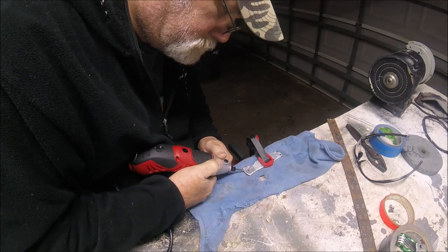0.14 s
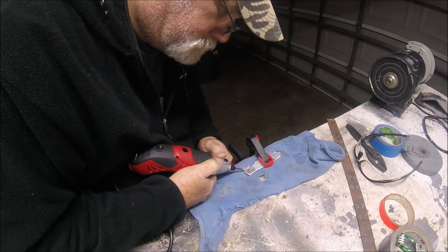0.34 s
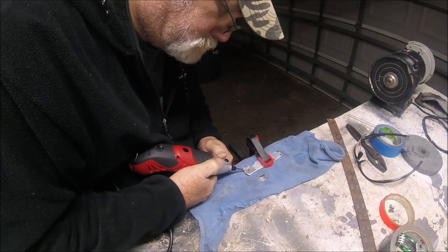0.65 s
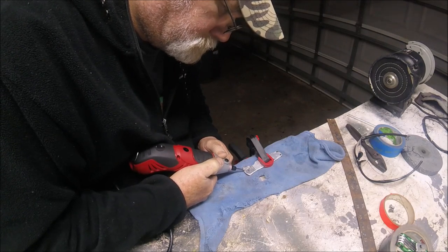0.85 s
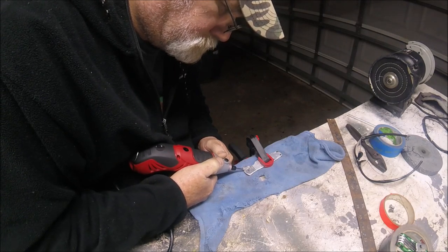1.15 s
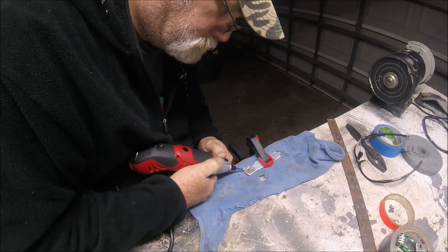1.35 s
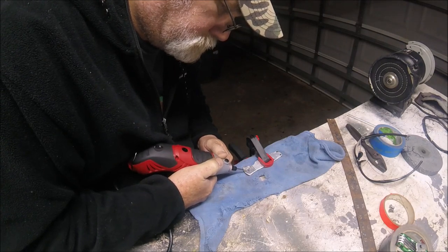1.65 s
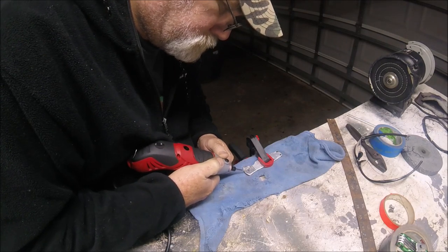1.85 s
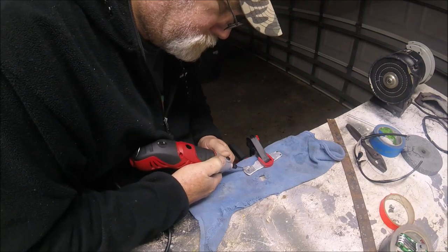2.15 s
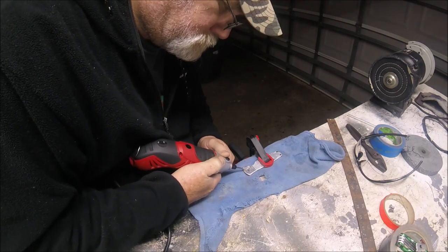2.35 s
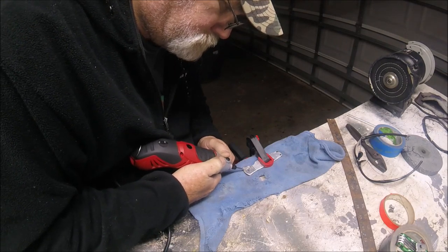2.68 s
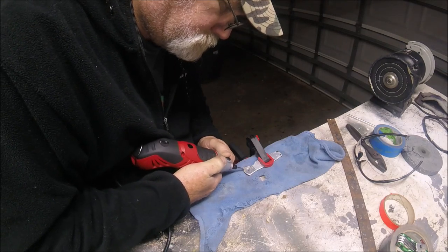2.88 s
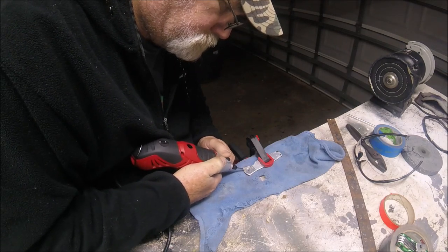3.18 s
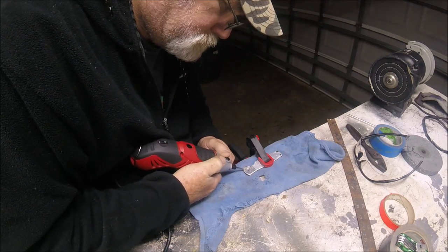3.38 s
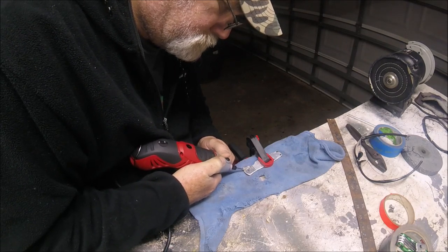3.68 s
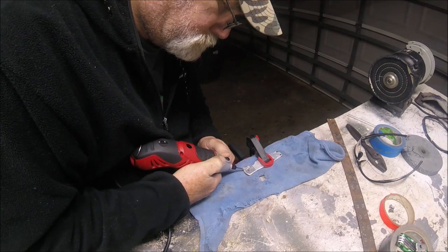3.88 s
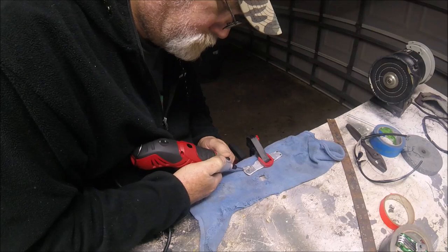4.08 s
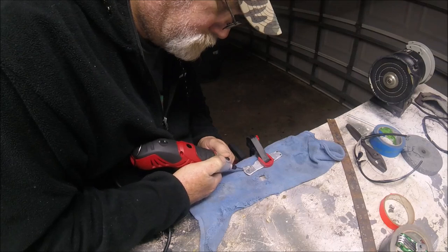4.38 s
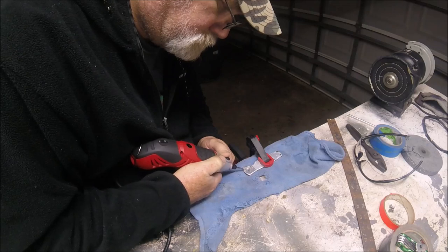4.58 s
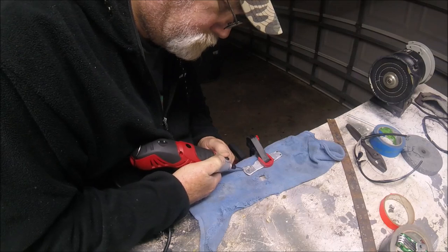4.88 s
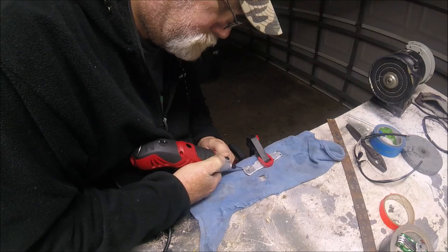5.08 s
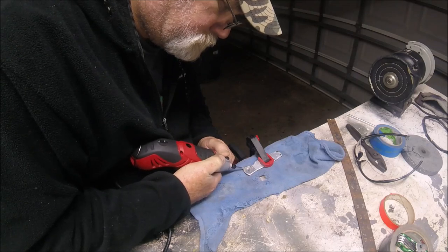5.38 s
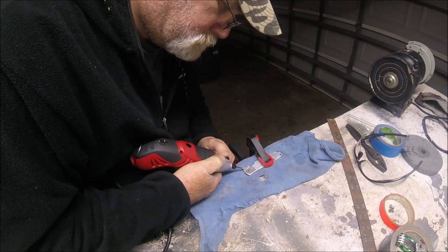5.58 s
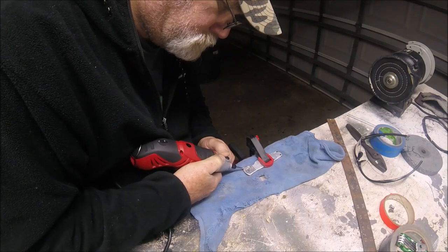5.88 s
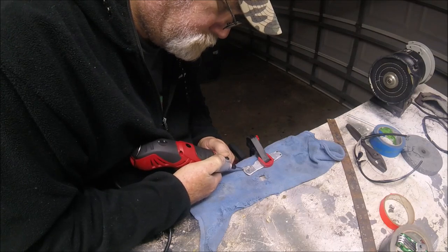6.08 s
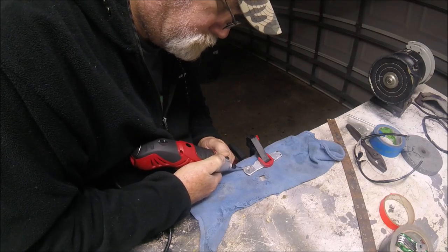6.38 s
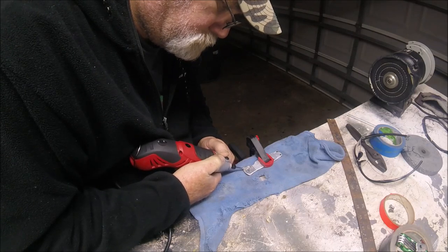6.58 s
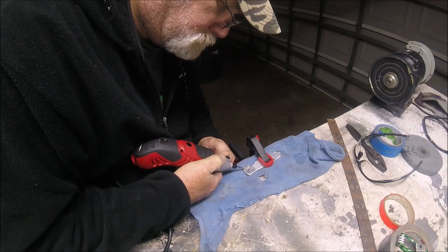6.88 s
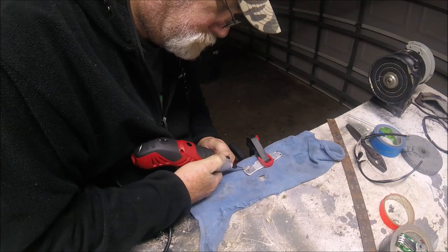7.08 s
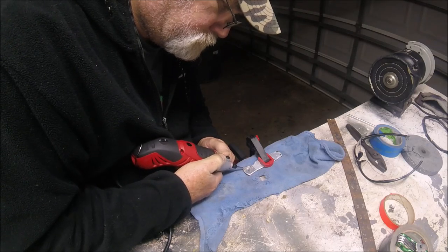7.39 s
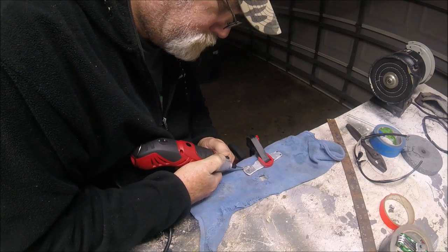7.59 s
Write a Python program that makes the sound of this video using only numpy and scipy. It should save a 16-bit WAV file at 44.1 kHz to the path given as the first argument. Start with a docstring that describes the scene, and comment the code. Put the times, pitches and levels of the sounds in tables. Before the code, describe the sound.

A small high-speed rotary tool whines steadily and is pressed repeatedly against metal, each press bursting into a loud, piercing, gritty buzz with screeches.

```python
"""Rotary tool grinding a small metal piece

A mains-powered rotary tool runs at about 21000 rpm over a workbench and is pressed five times against metal.
Running free, it whines, buzzes with the chopped mains current, and its fan hisses.
In the cut the bit strikes once a turn: the metal rings and grit rasps while the spindle slows.
It spins up again whenever the bit is lifted. A low workshop rumble lies underneath.
"""
import sys
import numpy as np
from scipy import signal
from scipy.fft import rfft, irfft
from scipy.io import wavfile
from scipy.ndimage import uniform_filter1d

SR = 44100
rng = np.random.default_rng(int(sys.argv[2]) if len(sys.argv) > 2 else 0)


def put_to_file(sound):
    """Save the sound as 16-bit audio at rate SR, in the file named by the first command-line argument."""
    columns = np.atleast_2d(sound).T  # one column per channel
    safe = np.clip(columns, -1, 1)
    whole_steps = np.round(safe * 32767)
    wavfile.write(sys.argv[1], SR, whole_steps.astype(np.int16))


N = 341334
TIME = np.arange(N) / SR

MAINS_HZ = 60
FREE_HZ, START_HZ, WORKING_HZ = 363.4, 341.8, 345  # spindle speeds in turns per second
HOUSING_HZ = 2690  # resonance of the tool's housing


def undb(db):
    """Decibels to gain."""
    return 10 ** (np.asarray(db) / 20)


def unit(x):
    """Scale to rms 1."""
    return x / np.sqrt(np.mean(x ** 2))


def curves(table):
    """The columns of a timed table, joined by straight lines to one value a sample."""
    seconds, *columns = np.transpose(table)
    return [np.interp(TIME, seconds, column) for column in columns]


def walk(rate):
    """Smooth random drift with a spread near 1, given a new target rate times a second."""
    step = max(int(SR / rate), 2)
    targets = rng.standard_normal(N)[:N // step + 1]
    return 1.22 * uniform_filter1d(np.repeat(targets, step), step)[:N]


def colour(x, points):
    """Shape a sound's spectrum by (Hz, dB) points; rms 1."""
    hz, db = np.transpose(points)
    bins = np.maximum(np.fft.rfftfreq(N, 1 / SR), 1)
    gain = undb(np.interp(np.log(bins), np.log(hz), db))
    return unit(irfft(rfft(x) * gain, N))


def resonate(x, hz, width_hz):
    """One resonance, gain 1 at its centre."""
    return signal.lfilter(*signal.iirpeak(hz, hz / width_hz, fs=SR), x)


def each_turn(turns):
    """One random value for every turn of the spindle, joined by straight lines."""
    values = rng.standard_normal(N // 100)
    return np.interp(turns, np.arange(len(values)), values)


def swell(at_s, length_s):
    """A smooth rise and fall around at_s, length_s wide at half height."""
    return np.cos(np.pi / 2 * np.clip((TIME - at_s) / length_s, -1, 1)) ** 2


# Spectrum of the workshop rumble: pitch_hz, relative level_db
RUMBLE_SPECTRUM = [(20, -15), (48, -11), (75, -3.5), (100, -13), (170, -23), (400, -18.5)]


def shop(rumble_db=-60):
    """Low steady rumble of the workshop: noise that falls away steeply towards the treble."""
    return undb(rumble_db) * colour(rng.standard_normal(N), RUMBLE_SPECTRUM + [(4000, -77.5)])


# The presses of the bit on the metal. The tone and grit columns are base values at the working speed:
# start_s, end_s, seating_time_s, drone_db (twice a turn), chatter_db (four times a turn),
# main_ring_db, main_ring_hz, upper_ring_db, upper_ring_hz, upper_ring_width_hz, grit_db
PRESSES = [(-0.1, 0.422, .05, -33.5, -39, -28.5, 5170, -32.5, 6500, 398, -35),
           (0.829, 1.674, 0.051, -31, -40, -26.5, 5170, -37, 6800, 1700, -41),
           (2.883, 4.792, 0.052, -30.5, -36, -31, 5080, -33.5, 6670, 1610, -40),
           (5.024, 6.702, 0.034, -30, -33, -28.5, 5230, -34.5, 6600, 1700, -40),
           (7.058, 7.9, 0.036, -30, -35, -30, 4800, -32.5, 5900, 1118, -40.5)]
BITE_S, LIFT_S = 0.0079, .05  # time for the first touch, time to leave the cut


def contact(seating=False):
    """1 while the bit is on the metal, with a ramp at each lift and touch: quick, or as slow as the bit seats."""
    total = 0
    for start, end, seat_s, *_ in PRESSES:
        touch_ramp = (TIME - start) / (seat_s if seating else BITE_S)
        lift_ramp = (end - TIME) / LIFT_S
        total = total + np.clip(np.minimum(touch_ramp, lift_ramp), 0, 1)
    return total


# How hard the bit is pushed while it touches: at_s, drag_hz (speed the drag would take away)
PRESSURE = [(0.0, 22.7), (0.15, 32.4), (0.22, 4.3), (0.41, 24.2), (0.83, 10.7), (1.1, 19.9), (1.22, 44.9),
            (1.32, 0.0), (1.42, 29.9), (1.65, 29.9), (2.89, 0.0), (3.0, 8.9), (3.2, 53.3), (3.38, 4.8),
            (3.56, 17.1), (3.8, 27.5), (3.95, 21.7), (4.62, 29.9), (4.77, 5.2), (5.02, 0.0), (5.12, 22.3),
            (5.28, 8.4), (5.6, 21.6), (5.9, 36.5), (6.32, 30.4), (6.46, 44.9), (6.69, 2.8), (7.06, 13.7),
            (7.3, 27.6), (7.54, 38.7), (7.68, 16.3)]


def drag():
    """The load on the spindle, as the speed in Hz that it would take away."""
    pressure, = curves(PRESSURE)
    return pressure * (contact() > 1 / 2)


def spindle(lag_s=.57):
    """Turns per second: the rotor's inertia makes it lag behind the free speed less the drag."""
    keep = np.exp(-1 / (lag_s * SR))
    target = FREE_HZ - drag()
    return START_HZ + signal.lfilter([1 - keep], [1, -keep], target - START_HZ)


def current(peak_at, sharpness):
    """The speed control lets one pulse of current through in each half wave of the mains; mean 1."""
    pulse = np.exp(sharpness * np.cos(2 * np.pi * (2 * MAINS_HZ * TIME - peak_at)))
    return pulse / pulse.mean()


# Partials of the free motor: multiple of the speed, base level_db
MOTOR_PARTIALS = [(2, -59), (4, -68), (6, -67), (13, -54.5), (14, -54), (15, -48), (16, -43.5), (17, -56),
                  (18, -52), (19, -62), (20, -65), (21, -67), (23, -66), (24, -65), (25, -66)]


def rotor_whine(angle, below_top, pull, throb=0.16):
    """The turning rotor hums at multiples of its speed, pulsing with the current."""
    whine = 0
    for order, db in MOTOR_PARTIALS:
        wave = np.sin(order * angle + rng.uniform(0, 2 * np.pi))
        whine = whine + undb(db + 1.3 * walk(16)) * wave
    return np.sqrt(2) * whine * (1 + throb * (pull - 1)) * undb(.2 * below_top)


def rotor_shake(angle, pull):
    """The current shakes the unbalanced rotor; the small housing radiates nothing far below the turning rate."""
    housing = signal.butter(10, 335, "high", fs=SR, output="sos")
    return unit(signal.sosfilt(housing, pull * np.sin(angle)))


def slot_buzz(angle, hz):
    """Eight armature slots pass the poles and the brushes spark; current pulses make them ring the housing."""
    sparks = .3 * rng.standard_normal(N)
    wave = current(peak_at=.69, sharpness=2.6) * (np.sin(8 * angle) + sparks)
    ringing = unit(resonate(resonate(wave, HOUSING_HZ, 460), HOUSING_HZ, 460))
    # the buzz fades as the speed outruns the resonance
    return undb(-.4 * np.maximum(hz - 353, 0) + .7 * walk(30)) * ringing


def armature_buzz(angle, below_top):
    """Abrupt switching of the current spreads a comb of weaker lines around the ninth partial."""
    switching = current(peak_at=.45, sharpness=14)
    return undb(.3 * below_top) * unit(resonate(switching * np.sin(9 * angle), 3330, 190))


def bearing_whine(angle, below_top, bearing_db=-50.7):
    """The balls run over the race at no whole multiple of the speed, with a weaker line one multiple higher."""
    race = np.sin(4.418 * angle) + .3 * np.sin(5.418 * angle)
    return undb(bearing_db + .45 * below_top + 1.6 * walk(14)) * unit(race)


# Spectrum of the fan's air: pitch_hz, relative level_db
FAN_SPECTRUM = [(200, -33), (520, -22), (750, -4), (1000, -16), (1250, -7.5), (1800, -11.5), (2750, -7),
                (3400, -10), (4100, -13.5), (4700, -4.5), (5300, -1), (6400, 0.5), (7000, -12.5),
                (8700, -12), (10000, -23)]


def fan_air(pull):
    """The fan's air is noise that flutters and pulses slightly with the current."""
    noise = rng.standard_normal(N) * (1 + .09 * (pull - 1)) * undb(.6 * walk(25))
    return colour(noise, FAN_SPECTRUM)


# The vents turn towards the microphone as the grip changes: at_s, lift_db of the whole motor
GRIP = [(.6, 1.5), (1.8, 1.1), (2.8, 3), (4.9, 3), (6.9, 3)]


def motor(turns, hz, shake_db=-63, slot_db=-39.6, armature_db=-47.2, fan_db=-40.5, braced_db=-7):
    """Rotor, buzz, bearing and fan together; the buzz drops while the bit is braced on the metal."""
    angle = 2 * np.pi * turns
    pull = current(peak_at=0.69, sharpness=2.1)
    below_top = hz - hz.max()  # the whines fade as the speed drops
    rotor = rotor_whine(angle, below_top, pull)
    shake = undb(shake_db) * rotor_shake(angle, pull)
    slots = undb(slot_db) * slot_buzz(angle, hz)
    armature = undb(armature_db) * armature_buzz(angle, below_top)
    buzz = undb(braced_db * contact()) * (shake + slots + armature)
    bearing = bearing_whine(angle, below_top)
    air = undb(fan_db) * fan_air(pull)
    grip_db, = curves(GRIP)
    return undb(grip_db) * (rotor + buzz + bearing + air)


# The bit catches and screeches: at_s (middle), length_s, main_ring_lift_db, main_ring_hz,
# upper_ring_lift_db, grit_change_db
SCREECHES = [(0.054, 0.22, 1, 5300, 4.5, -7.5), (0.287, 0.059, 8, 5300, 7.5, -6.5),
             (0.84, .02, 1.5, 4600, -1, 1), (0.988, 0.083, 1, 4870, 1, 4.5),
             (3.002, 0.046, 1, 5150, 3.5, 2.5), (3.117, 0.058, 8.5, 4930, 4.5, -22),
             (3.224, 0.087, 6.5, 5115, -1, 2), (3.455, 0.09, 7, 5340, 6, 6),
             (3.762, 0.043, 8, 5140, 0, -2.5), (4.635, 0.59, 6, 5194, 0, 2.5),
             (5.147, 0.05, 8.5, 5100, 1.5, -20.5), (5.267, 0.1, 6.5, 5170, 1.5, 2.5),
             (5.447, 0.062, 5.5, 5060, 0, 3.5), (5.63, 0.053, 2.5, 5130, 1, 0.5),
             (6.196, 0.32, 5.5, 5160, 0.5, -1), (6.48, 0.08, 7, 5140, -2, 0),
             (6.623, 0.19, 7, 5200, 2.5, 3), (7.08, 0.042, 6, 4890, -9, 1),
             (7.165, 0.04, 2, 5100, 2.5, -11), (7.633, 0.18, 4, 5400, 2.5, -0.5)]
# Dips in the tones, some from the hand easing off, one just before a touch:
# at_s (middle), length_s, change_db
TONE_DIPS = [(0.221, 0.036, -4.5), (1.068, 0.017, -1), (3.376, 0.19, -3.5), (5.005, 0.019, -28),
             (7.516, 0.045, -2)]
# The drone (twice a turn) and the chatter (four times a turn) swell or sink, together or apart:
# at_s (middle), length_s, drone_change_db, chatter_change_db
TONE_SWELLS = [(0.07, 0.17, 3.5, 1), (1.16, .08, 0.5, -3), (1.436, 0.092, 2, -1), (3.185, 0.38, 1.5, -0.5),
               (3.79, 0.12, 1.5, -1.5), (4.102, 0.12, 1, -1), (4.67, 0.059, 1.5, 2.5), (5.26, 0.1, -6, 0.5),
               (5.6, 0.076, 0, 3), (5.83, 0.21, 0.5, -3.5), (7.377, 0.28, 0, -3.5)]
# a faster bit bounces harder and rings lower; above the full speed the bouncing grows no further
CHATTER_DB_PER_HZ, FULL_CHATTER_HZ = 0.71, 351
RING_DB_PER_HZ, RING_SHIFT_HZ_PER_HZ = 0.2945, -18
# more drag tears off more grit, until the teeth are full
GRIT_DB_PER_HZ, FULL_GRIT_HZ = 0.3475, 30
SCREECH_DRONE_SHARE = 0.047  # a screech draws on the drone
# a resonance of the workpiece that the drone slides through
DRONE_HZ, DRONE_WIDTH_HZ, DRONE_LIFT_DB = 690, 12, 4


def cut(hz):
    """Levels and ring centres of the cut: each press has its own colour, bent by speed, drag and the tables."""
    held = [(s, *voice) for start, end, seat_s, *voice in PRESSES for s in (start, end)]
    drone, chatter, main, main_hz, upper, upper_hz, upper_width, grit = curves(held)
    fast = hz - WORKING_HZ
    drone = drone + DRONE_LIFT_DB / (1 + (2 * (2 * hz - DRONE_HZ) / DRONE_WIDTH_HZ) ** 2)
    chatter = chatter + CHATTER_DB_PER_HZ * (np.minimum(hz, FULL_CHATTER_HZ) - WORKING_HZ)
    main = main + RING_DB_PER_HZ * fast
    main_hz = main_hz + RING_SHIFT_HZ_PER_HZ * fast
    grit = grit + GRIT_DB_PER_HZ * (np.minimum(drag(), FULL_GRIT_HZ) - (FREE_HZ - WORKING_HZ))
    for at_s, length_s, lift_db, centre_hz, upper_lift_db, grit_db in SCREECHES:
        caught = swell(at_s, length_s)
        main = main + lift_db * caught
        main_hz = main_hz + (centre_hz - main_hz) * caught
        drone = drone - SCREECH_DRONE_SHARE * lift_db * caught
        upper = upper + upper_lift_db * caught
        grit = grit + grit_db * caught
    for at_s, length_s, drone_db, chatter_db in TONE_SWELLS:
        shape = swell(at_s, length_s)
        drone = drone + drone_db * shape
        chatter = chatter + chatter_db * shape
    dip = sum(db * swell(at_s, length_s) for at_s, length_s, db in TONE_DIPS)
    # the metal rings at first touch; drone and chatter build as the bit seats itself
    touch = 20 * np.log10(contact() + 1e-5)
    seated = 20 * np.log10(contact(seating=True) + 1e-5)
    drone = drone + seated + dip
    chatter = chatter + (touch + seated) / 2 + dip
    main = main + touch + dip
    upper = upper + touch + dip
    return drone, chatter, main, main_hz, upper, upper_hz, upper_width, grit + touch


def partials(angle, orders, gains, wander_db):
    """Partials of the strike with a joint rms near 1; each wanders and flickers as the contact point shifts."""
    gains = [g * undb(wander_db * walk(6) + walk(45)) for g in gains]
    tone = 0
    for order, gain in zip(orders, gains):
        # low partials push together; those above the ninth ring on with a phase of their own
        phase = (order > 9) * rng.uniform(0, 2 * np.pi) + 0.014 * order * walk(6.2)
        tone = tone - gain * np.cos(order * angle + phase)
    return tone * np.sqrt(2 / sum(g ** 2 for g in gains))


def ring(angle, hz, rows, centre_hz, width_hz, wander_db):
    """Strike partials lifted by a resonance of the metal, which moves with the grip and the contact point."""
    orders = [order for order, db in rows]
    gains = [undb(db) / np.hypot(1, 2 * (order * hz - centre_hz) / width_hz) for order, db in rows]
    return partials(angle, orders, gains, wander_db)


def recut(chips, turns, memory, count=3):
    """The same teeth meet the same grooves on the next turns, so the rasp partly repeats."""
    return sum(memory ** j * np.interp(turns - j, turns, chips) for j in range(count))


# Spectrum of the torn-off grit: pitch_hz, relative level_db
GRIT_SPECTRUM = [(200, -33.5), (540, -21), (800, -18.5), (1150, -20), (2000, -14), (2900, -10),
                 (3700, -17.5), (4400, -13.5), (5150, 1), (6000, -12.5), (7000, -11), (8000, -14),
                 (9600, -25.5)]


def grit_rasp(angle, turns, force, bite=0.057, bursts_db=1.4):
    """The teeth tear chips off in uneven bursts of noise, most as the bit strikes."""
    strike = np.exp(bite * np.cos(angle))
    chips = rng.standard_normal(N) * strike * force * undb(bursts_db * walk(50))
    return colour(recut(chips, turns, memory=.55), GRIT_SPECTRUM)


# Partials of the once-a-turn strike, as a dull knock and in the metal's two resonances.
# Each table: multiple of the speed, relative level_db
KNOCK_PARTIALS = [(3, -4), (5, 1.5), (6, -3), (9, 3.5), (10, -14), (11, -13), (12, -7)]
MAIN_RING_PARTIALS = [(13, -4.5), (14, 1.5), (15, 2.5), (16, 3), (17, -1)]
UPPER_RING_PARTIALS = [(18, 2.5), (19, 0.5), (20, -0.5), (21, -6.5), (22, -1.5), (23, -3.5), (24, -2),
                       (25, -1.5), (26, -11.5), (27, 0.5), (28, -7)]


def grinding(turns, hz, scatter_db=1.11, jitter_turns=.0018, torque_throb=.2, rasp_db=7.4):
    """The bit strikes once a turn, never quite evenly; each strike rings the metal and tears off grit."""
    drone, chatter, main, main_hz, upper, upper_hz, upper_width, grit = cut(hz)
    # the more grit is torn off, the more the bit bounces; without it the strikes lock into a clean screech
    bounce = np.minimum(undb(grit + 41), 1.15)
    # the pulses of torque hurry the strikes a little
    hurry = 0.00063 * current(peak_at=0.77, sharpness=0.91)
    jitter = jitter_turns * bounce * each_turn(turns)
    angle = 2 * np.pi * (turns + hurry + jitter + .004 * walk(45))

    def wave(order):
        """One partial of the strike, rms near 1."""
        return -np.sqrt(2) * np.cos(order * angle)

    # harder pressure drags the speed down and strengthens the once-a-turn thump
    thump = undb(drone - 14.5 + 0.38 * (hz.mean() - hz) + walk(22)) * wave(1)
    hum = undb(drone + 1.5 + .6 * walk(18)) * wave(2)
    # the seventh partial is loudest where it meets a resonance of the workpiece
    seventh = undb(chatter - 2 + 3 * walk(12)) / np.hypot(1, (7 * hz - 2410) / 75) * wave(7)
    # the eighth swells as the speed sinks to the resonance of the housing
    eighth = undb(drone - 8 + 2 * walk(10)) / np.hypot(1, (8 * hz - HOUSING_HZ) / 20) * wave(8)
    # part of the knock follows the pulses of current
    throb = torque_throb * (current(peak_at=.69, sharpness=1.5) - 1)
    rattle = undb(chatter + 2.0 * walk(25)) * (1 + throb / 2) * wave(4) + seventh + eighth
    # the knock grows with both the drone and the chatter, and as the spindle labours
    knock_orders = [order for order, db in KNOCK_PARTIALS]
    knock_gains = [undb(db) for order, db in KNOCK_PARTIALS]
    knock_db = (chatter + drone) / 2 - 2.5 - 0.1163 * (hz - WORKING_HZ)
    knock = undb(knock_db) * (1 + throb) * partials(angle, knock_orders, knock_gains, wander_db=4.0)
    main_ring = ring(angle, hz, MAIN_RING_PARTIALS, main_hz, width_hz=800, wander_db=1.6)
    upper_ring = ring(angle, hz, UPPER_RING_PARTIALS, upper_hz, upper_width, wander_db=4.0)
    metal = undb(main + .8 * walk(25)) * main_ring + undb(upper + 1 + 1.2 * walk(25)) * upper_ring
    force = undb(scatter_db * bounce * each_turn(turns))
    rasp = undb(grit + rasp_db) * grit_rasp(angle, turns, force)
    return thump + hum + rattle + force * (knock + metal) + rasp


def room(x, t60_s=0.25, wet_db=-20):
    """A short, weak tail of fading noise from the bench and the walls."""
    t = TIME[:SR // 2]
    tail = rng.standard_normal(len(t)) * undb(-60 * t / t60_s) * (t > .004)
    return x + undb(wet_db) * signal.fftconvolve(x, tail / np.linalg.norm(tail))[:N]


def scene():
    """One spindle drives both the motor and the bit, over the rumble of the shop."""
    hz = spindle()
    turns = np.cumsum(hz) / SR
    tool = motor(turns, hz) + grinding(turns, hz)
    return (room(tool) + shop())[None]


def record(dry, top_hz=10000):
    """A steep low-pass filter cuts the top of the treble."""
    return signal.sosfilt(signal.ellip(10, .2, 70, top_hz, fs=SR, output="sos"), dry)


dry = scene()
out = record(dry)
put_to_file(out)
```